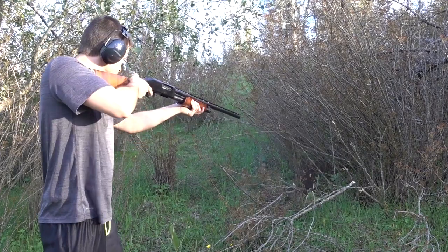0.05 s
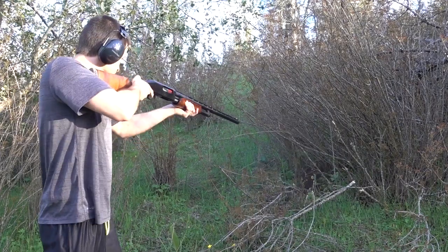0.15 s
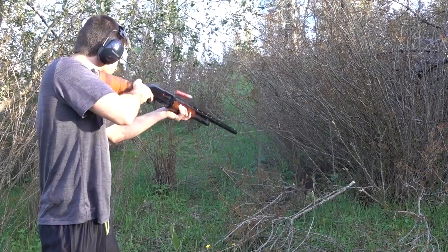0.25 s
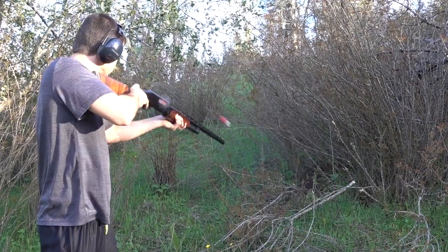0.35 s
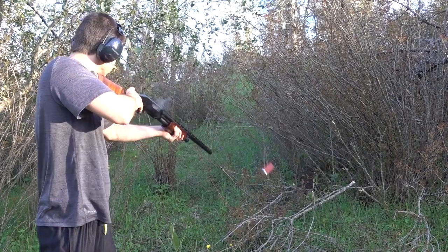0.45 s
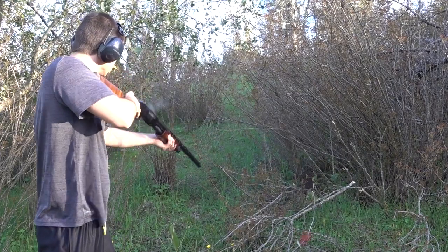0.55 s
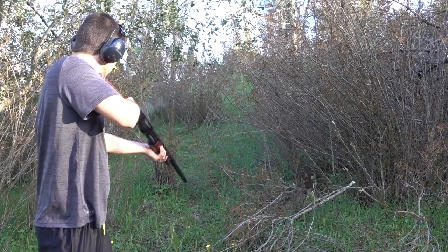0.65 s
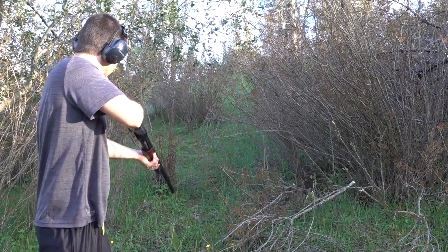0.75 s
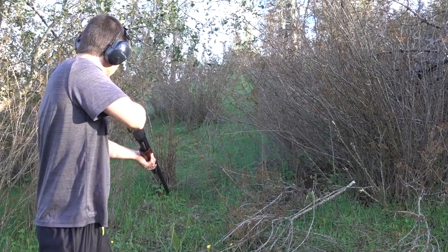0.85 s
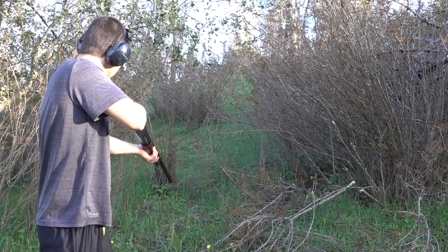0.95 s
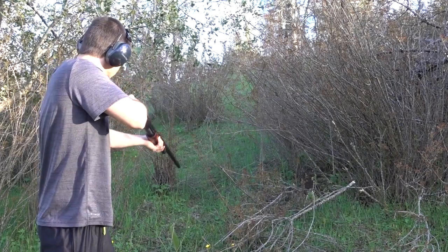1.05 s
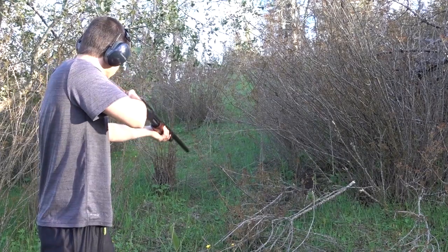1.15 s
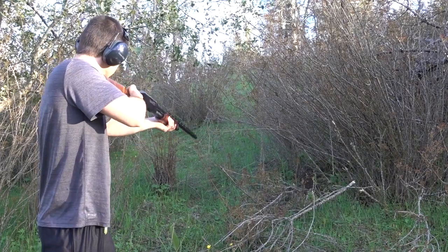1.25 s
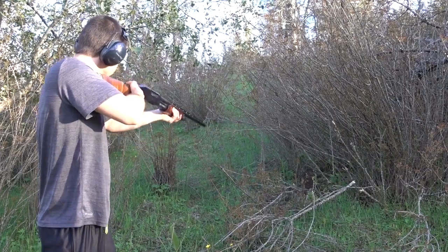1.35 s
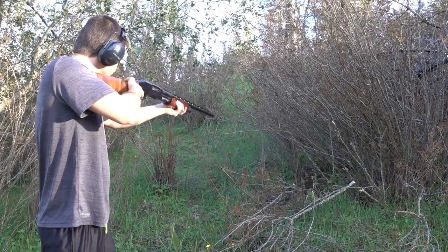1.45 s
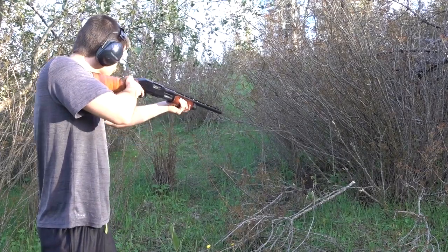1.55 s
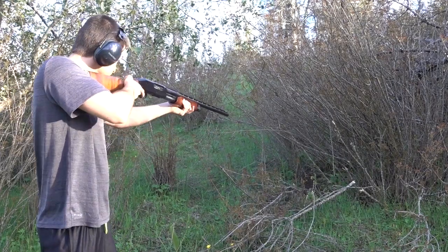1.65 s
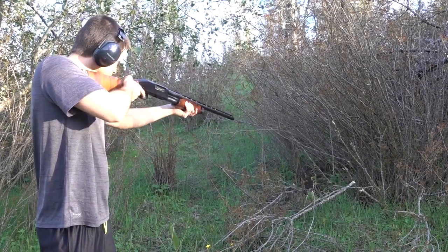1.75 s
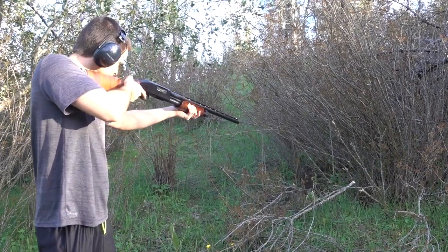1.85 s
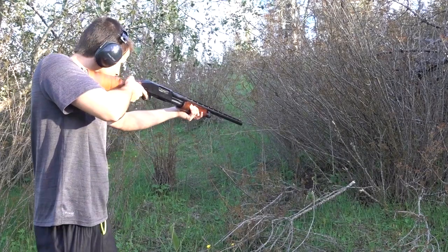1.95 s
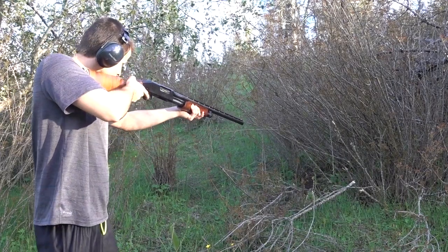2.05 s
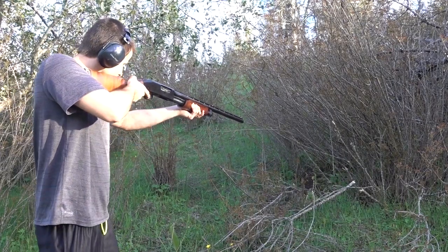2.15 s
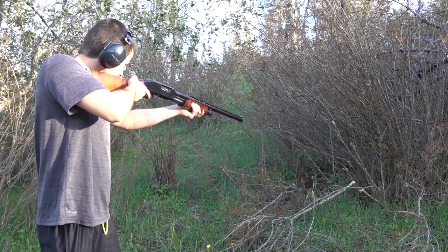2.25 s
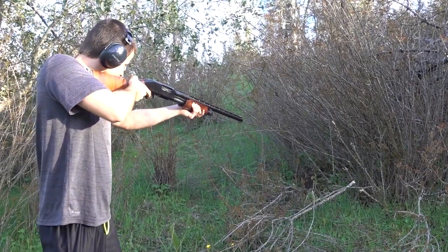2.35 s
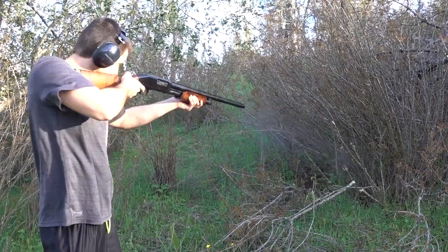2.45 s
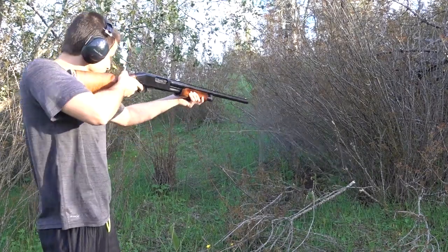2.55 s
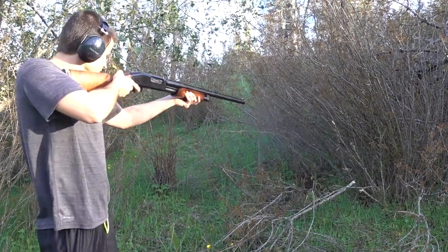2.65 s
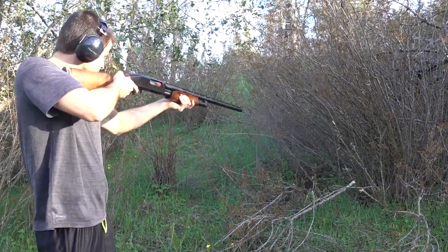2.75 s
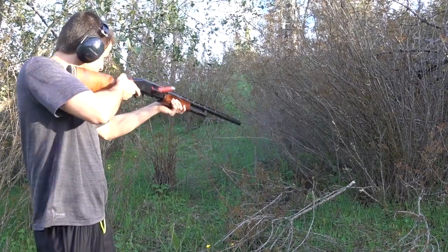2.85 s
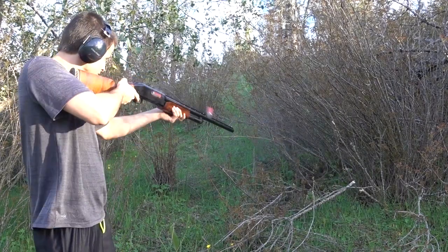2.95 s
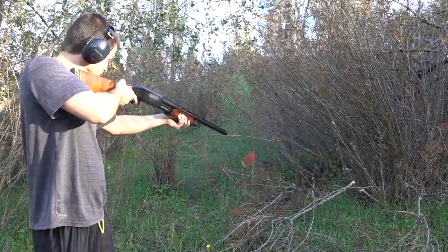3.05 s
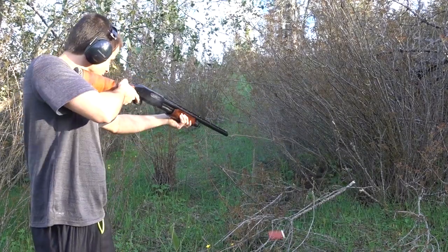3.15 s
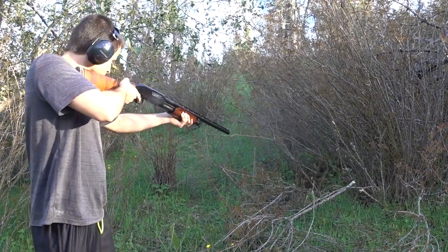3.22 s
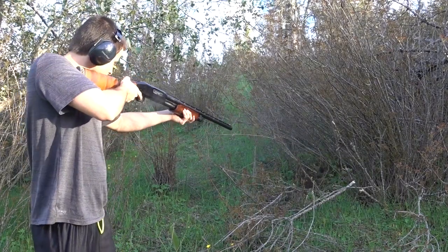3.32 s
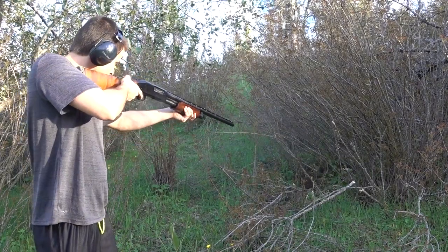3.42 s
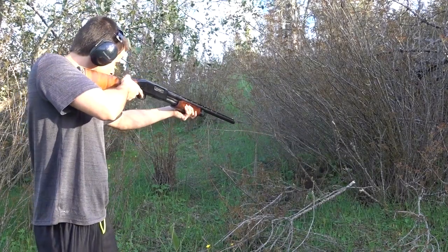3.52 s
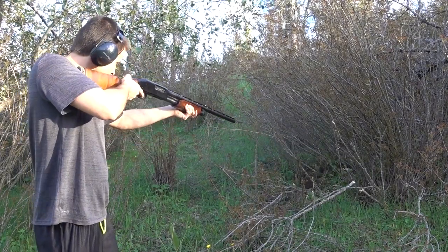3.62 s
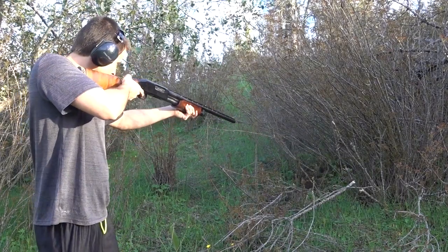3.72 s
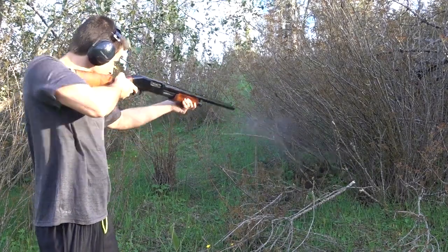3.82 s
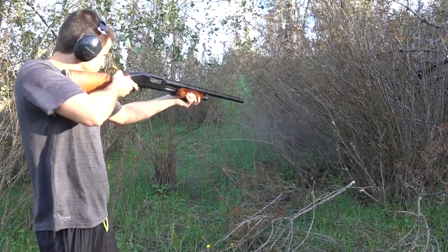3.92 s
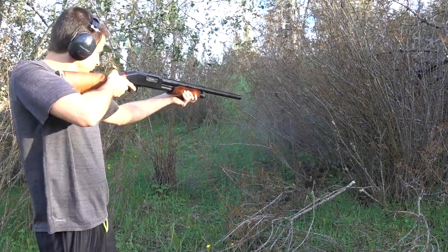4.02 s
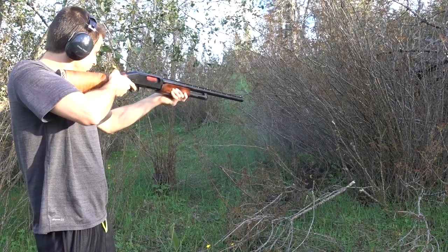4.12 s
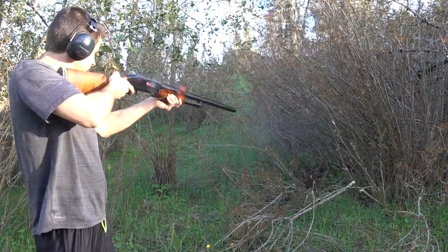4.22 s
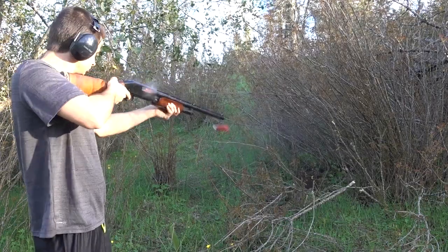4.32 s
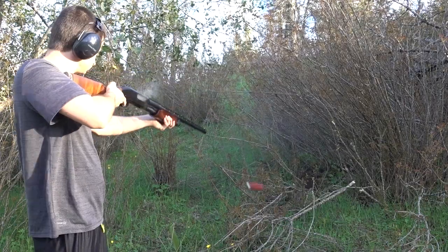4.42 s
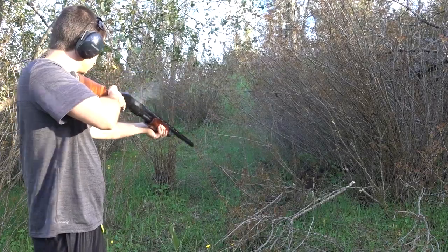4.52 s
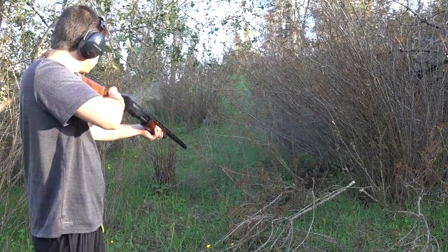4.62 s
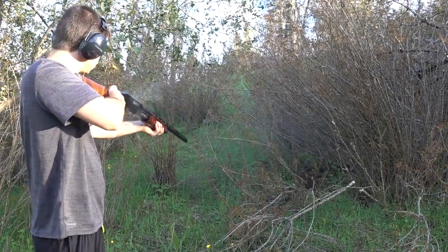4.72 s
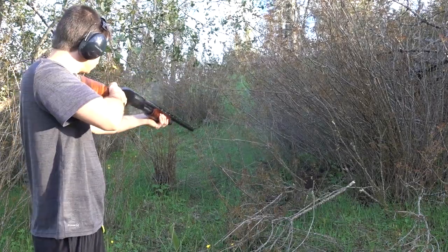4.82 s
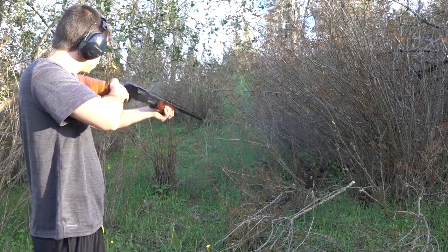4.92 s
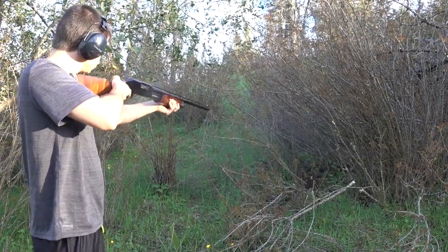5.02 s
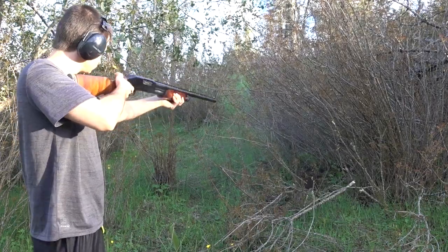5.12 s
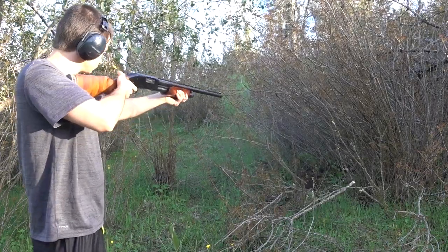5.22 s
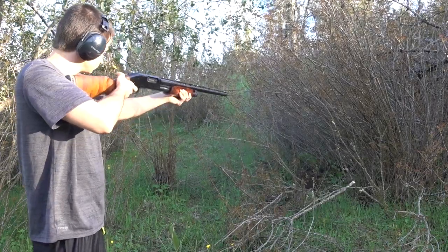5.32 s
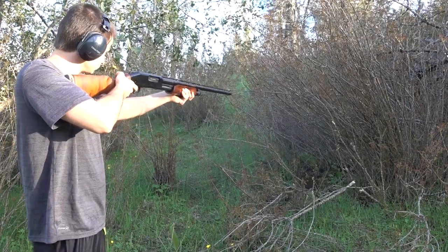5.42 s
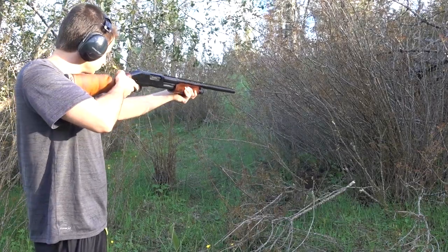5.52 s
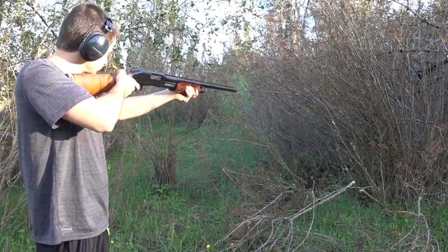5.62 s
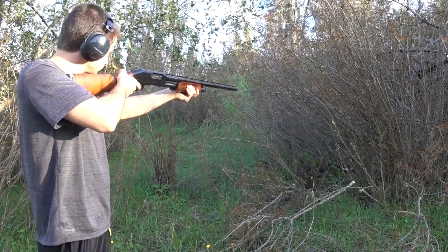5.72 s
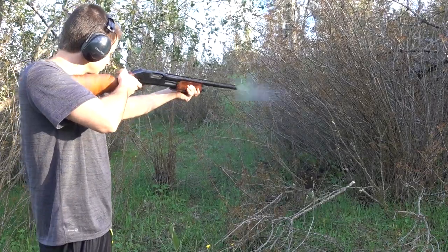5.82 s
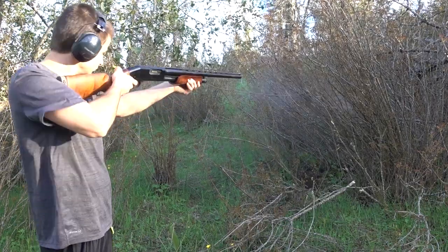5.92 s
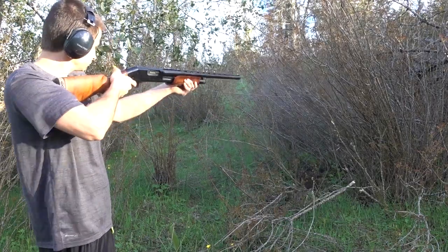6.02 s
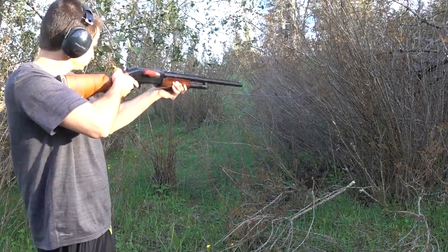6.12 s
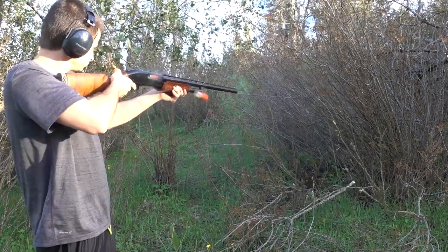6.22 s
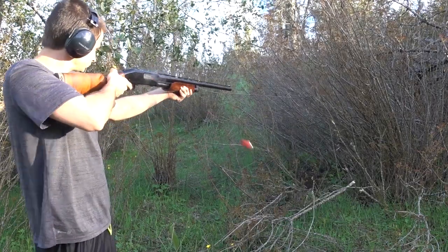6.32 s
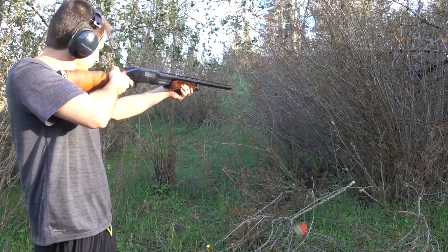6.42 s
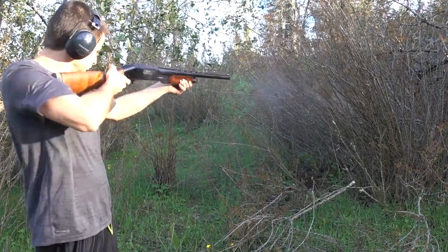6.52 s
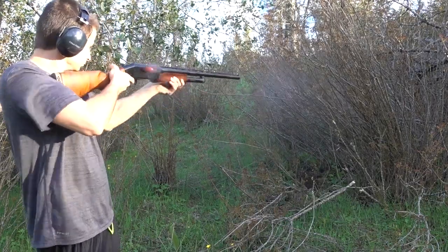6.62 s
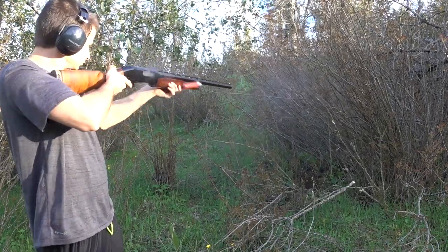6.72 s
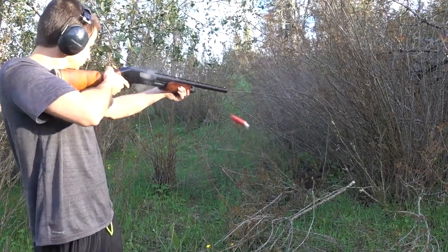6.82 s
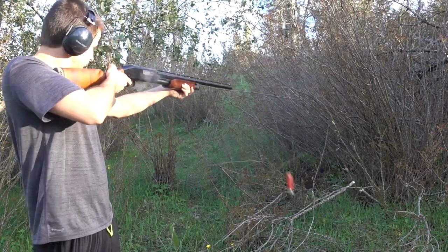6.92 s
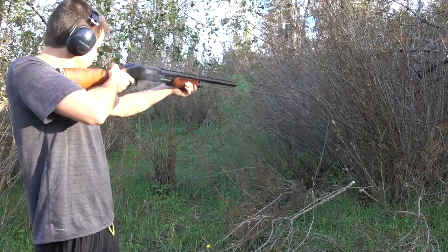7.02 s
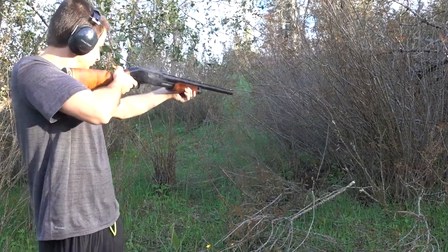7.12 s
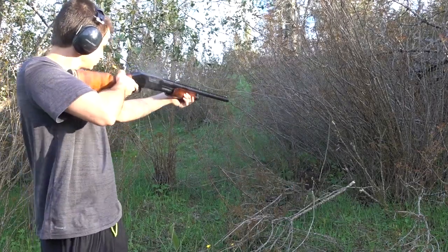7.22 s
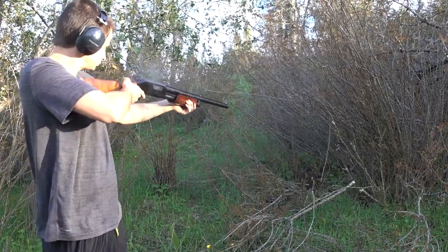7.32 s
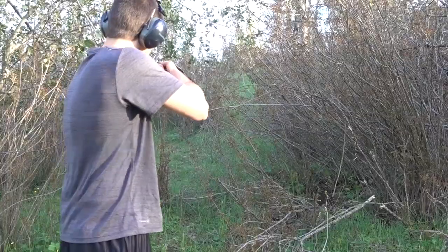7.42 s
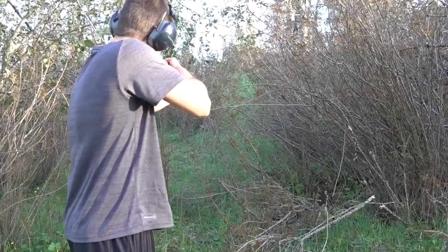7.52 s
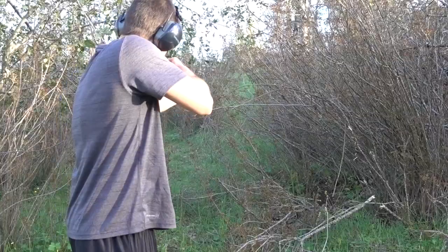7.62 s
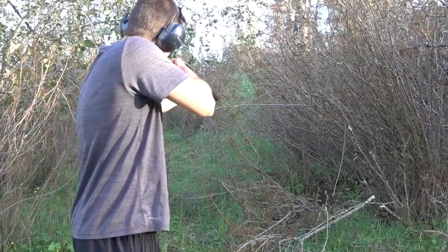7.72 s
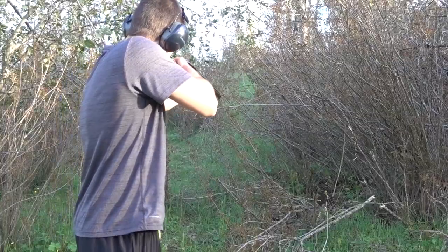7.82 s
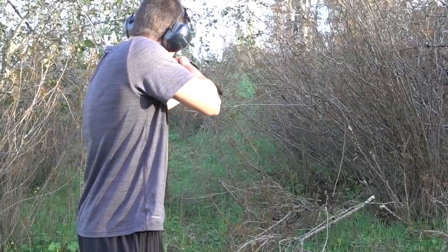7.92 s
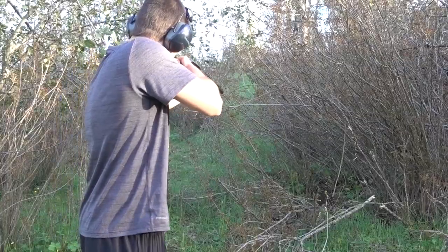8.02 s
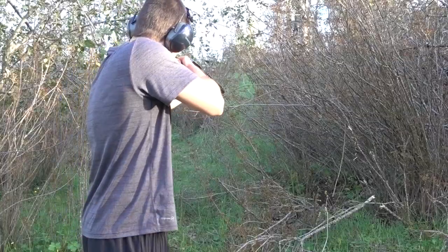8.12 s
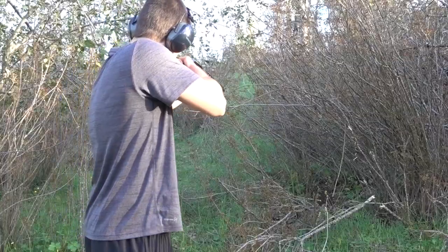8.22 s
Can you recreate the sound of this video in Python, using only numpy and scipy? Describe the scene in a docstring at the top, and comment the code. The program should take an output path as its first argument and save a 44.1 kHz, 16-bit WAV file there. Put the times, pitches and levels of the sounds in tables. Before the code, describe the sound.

A camera microphone close to a shooter captures five shotgun blasts in a wooded clearing, the first caught in mid-roar. Each bursts bright and dense, then dulls into a short lumpy echo leaning right. Quick two-part metallic racking follows, slightly left, crisp and rattling. Quiet gaps hold light ticks, a soft hush of leaves, a faint band of distant frogs and thin pulsed cricket chirps, clearest at the end.

```python
"""A pump shotgun fires five times in a brushy clearing; the first roar is already under way at the start.
Blast echoes are shaped stereo noise: bright from the near brush, duller from the trees beyond.
The racked steel action is noise bursts, rings and chatter; shells and twigs tick in the same steel-toned way.
A cricket chirps in pulsed tones over a hush of leaves and a faint noise band of far frogs."""
import sys
import numpy as np
from scipy import signal
from scipy.fft import rfft, irfft, next_fast_len
from scipy.io import wavfile
from scipy.ndimage import uniform_filter1d, map_coordinates

SR = 44100
rng = np.random.default_rng(int(sys.argv[2]) if len(sys.argv) > 2 else 0)


def ratio(d):
    """dB to gain"""
    e = np.asarray(d, float) / 20
    return 10 ** e


def waveform_to_disk(signal):
    """Save audio, clipped to [-1, 1], as 16-bit WAV at the path in sys.argv[1]."""
    frames = np.transpose(np.atleast_2d(signal))
    scaled = np.clip(frames, -1, 1) * 32767
    samples = np.round(scaled).astype(np.int16)
    wavfile.write(sys.argv[1], SR, samples)


N = 364266
TIME = np.arange(N) / SR  # seconds


def unit(x):
    """Scaled to rms 1."""
    return x / np.sqrt(np.mean(x ** 2) + 1e-20)


def along(points, hz):
    """(Hz, value) points read on a log frequency axis."""
    f, v = np.transpose(points)
    return np.interp(np.log(hz + 1), np.log(f + 1), v)


def level(start, after_s, db, fade):
    """Gain per sample: silent before start, then dB at the given delays, then dying at fade dB a second."""
    age = TIME - start
    dying_db = fade * np.maximum(age - after_s[-1], 0)
    return (age >= 0) * ratio(np.interp(age, after_s, db) - dying_db)


def wobble(rate):
    """A smooth random curve, rate knots a second."""
    knots = rng.standard_normal(int(N * rate / SR) + 4)
    return map_coordinates(knots, [TIME * rate])


def filtered(x, response):
    """x passed through a response of frequency, which may be complex."""
    m = next_fast_len(N + SR // 2)
    return irfft(rfft(x, m) * response(np.fft.rfftfreq(m, 1 / SR)), m)[..., :N]


def rush(tone, alike, lo_hz, hi_hz, patchy_db):
    """Toned stereo noise in patches of random gain; its middle has rms 1 between lo_hz and hi_hz."""
    z = signal.stft(rng.standard_normal((2, N)), nperseg=256)[2]
    field = uniform_filter1d(rng.standard_normal(z.shape[1:]), size=5, axis=0)
    field = uniform_filter1d(field, size=5, axis=1)
    pair = signal.istft(z * ratio(patchy_db * unit(field)), nperseg=256)[1][:, :N]

    def mid_side(hz):
        # half the angle whose cosine is the left-right correlation
        turn = np.arccos(np.clip(along(alike, hz), -1, 1)) / 2
        return ratio(along(tone, hz)) * np.array([np.cos(turn), np.sin(turn)])

    mid, side = filtered(pair, mid_side)
    band = filtered(mid, lambda hz: (hz > lo_hz) & (hz < hi_hz))
    return np.array([mid + side, mid - side]) / np.sqrt(np.mean(band ** 2))


# Moments of the blasts, in seconds; the first goes off just before the start.
BLAST_S = [-.17, 2.469, 3.862, 5.922, 6.561]
# How the aim of each blast wakes the clearing. Each row: drive in dB of the trees, of the far tree line
# and of the brush, brush hold in seconds, brush fade in dB per second.
BLAST_AIM = [(-25, -48.5, -24.5, 0.17, 171.5), (-20.5, -46.5, -15.5, 0.15, 126),
             (-22, -46.5, -16.5, 0.18, 181.5), (-23.5, -47, -14.5, .2, 408), (-26, -55.5, -11, 0.15, 270)]
# The near trunks answer every blast alike. Each row: seconds after the blast, dB added to the trees' drive.
TRUNK_ANSWER = [(0, -20), (0.059, -3), (.12, -4.5), (.165, 1), (0.201, -5.5), (0.302, -10), (.46, -21),
                (0.679, -33.5)]
# A far tree line returns late. Each row: seconds after the blast, dB added to the far tree line's drive.
FAR_LINE_ANSWER = [(.5, -29.5), (.75, -8), (.92, -5), (1.06, -9.5), (1.2, -16.5), (1.35, -34)]
# Colour of the tree echoes before their treble is lost. Each row: frequency in Hz, relative density in dB.
TRUNK_COLOUR = [(24, -73.5), (40, -35.5), (149, -44.5), (352, -20.5), (554, -3.5), (607, -5.5), (664, -1.5),
                (761, -2), (977, 0.5), (1800, 2), (9000, -23), (11700, -49), (19800, -120)]
# Colour of the brush echoes at their brightest. Each row: frequency in Hz, relative density in dB.
BRUSH_COLOUR = [(24, -78.5), (40, -49), (272, -15.5), (702, -2.5), (1370, -14), (1720, -0.5), (2000, -2),
                (3630, -0.5), (7860, -4), (15400, -7.5)]
# Stereo width of the echo noise. Each row: frequency in Hz, left-right correlation (1 is mono).
ECHO_WIDTH = [(60, 1), (300, 0.99), (600, 0.96), (1650, .63), (4970, .06), (15000, .04)]
ECHO_FADE_DB_PER_S = 80
BRUSH_RISE_S, BRUSH_RISE_DB, BRUSH_SAG_DB_PER_S = 0.006, 5, 36


def tree_echoes(age):
    """The roar is randomly lumpy; the longer the path, the more treble the air and leaves take."""
    after_s, answer_db = np.transpose(TRUNK_ANSWER)
    late_s, late_db = np.transpose(FAR_LINE_ANSWER)
    gain = 0
    for s, (trees_db, far_db, *_) in zip(BLAST_S, BLAST_AIM):
        gain = gain + level(s, after_s, trees_db + answer_db, ECHO_FADE_DB_PER_S)
        gain = gain + level(s + late_s[0], late_s - late_s[0], far_db + late_db, ECHO_FADE_DB_PER_S)
    early = rush(TRUNK_COLOUR, ECHO_WIDTH, 400, 1116, patchy_db=2.0)
    late = filtered(early, lambda hz: (1 + (450 / (hz + 300)) ** 2) / (1.3 + (hz / 1350) ** 4))
    share = np.clip((age - 0.2) / 0.45, 0, 1)  # the dull noise takes over, and the lumps smooth out
    lumps = ratio(2.37 * (1 - 0.9 * share) * wobble(70))
    trees = gain * lumps * (early + share * (late - early))
    return trees * ratio([[-0.4], [0.4]])  # leans to the right


def brush_echoes(age):
    """Bright noise leaps up with each blast, sags, then fades, losing treble as it ages."""
    gain = 0
    for s, (*_, db, hold, fade) in zip(BLAST_S, BLAST_AIM):
        course_db = [db - BRUSH_RISE_DB, db, db - BRUSH_SAG_DB_PER_S * hold]
        gain = gain + level(s, [0, BRUSH_RISE_S, hold], course_db, fade)
    near = rush(BRUSH_COLOUR, ECHO_WIDTH, 2400, 21000, patchy_db=3.3)
    behind = 1.3 * filtered(near, lambda hz: 1 / (1 + (hz / 7500) ** 2))
    share = np.clip((age - 0.035) / 0.12, 0, 0.8)
    return gain * ratio(0.55 * wobble(150)) * (near + share * (behind - near))


def echoes():
    """The roar of tree and brush echoes, dulling with the time since the latest blast."""
    shots = np.array(BLAST_S)
    age = TIME - shots[np.searchsorted(shots[1:], TIME)]
    return tree_echoes(age) + brush_echoes(age)


# The evening air. Each row: time in seconds, gain in dB of the leaves, gain in dB of the far frogs,
# both before their slow wavering.
EVENING_AIR = [(0, -41.5, -69.5), (1.1, -61, -71), (1.5, -66, -70), (2.4, -61.5, -66), (3.6, -80.5, -72),
               (5.301, -69, -74), (5.45, -70, -74.5), (5.9, -65.5, -72), (7.41, -65, -68.5),
               (7.45, -55.5, -60.5), (7.7, -56, -62.5), (7.85, -59.5, -61.5), (8.26, -60.5, -63.5)]
# Colour of the leaves and of the blast tails. Each row: frequency in Hz, relative density in dB.
AIR_COLOUR = [(35, -66.5), (60, -45.5), (81, -31), (183, -31.5), (253, -34.5), (597, -11), (719, -6.5),
              (1090, -7.5), (2140, -5.5), (2460, -3.5), (2900, -7.5), (10400, -12), (14400, -13),
              (15400, -14.5)]
# Stereo width of the same noise. Each row: frequency in Hz, left-right correlation (1 is mono).
AIR_WIDTH = [(60, 0.93), (240, 0.62), (950, 0.13), (3770, 0.27), (15000, 1)]
# a broadband tail of each blast lingers, then fades; the dB adds to that blast's far tree line drive
TAIL_DB, TAIL_HOLD_S, TAIL_DB_PER_S = -8, 0.72, 20.5


def air():
    """A hush of leaves and a broadband tail of each blast, with a band of far frogs below and near 2.5 kHz."""
    air_s, leaves_db, frogs_db = np.transpose(EVENING_AIR)
    leaves = level(0, air_s, leaves_db, fade=0)
    tail = sum(level(s, [0, TAIL_HOLD_S], [far_db + TAIL_DB] * 2, TAIL_DB_PER_S)
               for s, (_, far_db, *_) in zip(BLAST_S, BLAST_AIM))
    hush = ratio(0.8 * wobble(8.1)) * rush(AIR_COLOUR, AIR_WIDTH, 2100, 15000, patchy_db=1.2)

    def frog_band(hz):
        peak = 1 / (1 + ((hz - 2480) / 120) ** 2)
        plateau = 0.62 / (1 + ((hz - 2050) / 600) ** 6)
        return peak + plateau

    frogs = unit(filtered(rng.standard_normal((2, N)), frog_band))
    frog_gain = level(0, air_s, frogs_db, fade=0) * ratio(1.1 * wobble(0.81) + 1.5 * wobble(25))
    return np.hypot(leaves, tail) * hush + frog_gain * frogs


# Resonances of receiver and barrel. Each row: centre in Hz, width in Hz, strength in dB over the background.
STEEL_MODES = [(1190, 600, -15.5), (2525, 59, -12.5), (3460, 170, -11.5), (4100, 160, -5),
               (6040, 250, -13.5), (7260, 510, -14.5), (10800, 400, -22.5)]


def modes(f):
    """The steel's resonances over a broad background."""
    return 1 + sum(ratio(db) * 1j * f * w / (c * c - f * f + 1j * f * w) for c, w, db in STEEL_MODES)


# The fore-end goes back, forward, and the bolt locks. Each row: start in seconds, length in seconds,
# drive in dB at the start, drive in dB at the end.
PUMP_STROKES = [(0.231, 0.11, -19, -23.5), (0.404, 0.094, -21, -32.5), (0.503, 0.013, -40.5, -17.5),
                (2.843, 0.1, -21.5, -20.5), (3.004, 0.084, -29, -22.5), (3.105, 0.029, -27, -24.5),
                (4.167, 0.098, -24, -21), (4.351, .085, -29.5, -24), (4.454, 0.023, -17, -24.5),
                (6.151, .096, -18, -25), (6.297, 0.054, -20.5, -23), (6.373, 0.02, -15.5, -24),
                (6.802, 0.091, -27.5, -23), (7.121, .005, -23, -25)]
STROKE_RISE_S, STROKE_RISE_DB, STROKE_STOP_DB_PER_S = 0.0027, 16, 562
STROKE_ECHO_DB, STROKE_ECHO_DB_PER_S = -14, 145.5  # the brush throws the clatter back


def slide():
    """Gain of the sliding fore-end: a quick start, the stroke, a hard stop and a short echo."""
    gain = 0
    for s, length, db0, db1 in PUMP_STROKES:
        course_s = [0, STROKE_RISE_S, STROKE_RISE_S + length]
        gain = gain + level(s, course_s, [db0 - STROKE_RISE_DB, db0, db1], STROKE_STOP_DB_PER_S)
        gain = gain + level(s + length, [0], [db1 + STROKE_ECHO_DB], STROKE_ECHO_DB_PER_S)
    return gain


def rattles():
    """Loose parts knock about every 11 ms while the slide moves, each ringing on a chance resonance."""
    rows = []
    spread_db = 2.5
    for start, length, db0, db1 in PUMP_STROKES:
        gap, body, treble, pick = rng.standard_normal((16, 4)).T
        after = np.cumsum(0.011 * np.exp(0.4 * gap))
        db = db0 + (db1 - db0) * after / length
        mode = np.clip(np.round(2.3 + 1.3 * pick), 1, 5).astype(int)
        hz = np.array(STEEL_MODES)[mode, 0]
        rattle = zip(start + after, db + spread_db * body, db + spread_db * treble, hz)
        rows += [row for row in rattle if row[0] < start + length]
    return rows


# Hard clacks of bolt, carrier and shell. Each row: start in seconds, body drive in dB, treble drive in dB,
# ring of the struck part in Hz.
BOLT_CLACKS = [(0.1354, -19, -25, 2100), (0.172, -20, -23.5, 2720), (0.187, -14.5, -14, 3350),
               (0.1984, -23, -36, 2810), (0.2049, -8, -21.5, 2450), (0.2274, -12.5, -20, 3310),
               (0.2424, -19, -30, 2560), (0.2504, -18, -9, 3380), (0.2774, -18, -17, 2940),
               (0.2834, -8.5, -4, 2760), (0.3014, -21, -15, 3810), (0.3222, -24, -16, 4930),
               (0.3356, -38, -11, 4220), (0.3444, -8, -1, 4240), (0.3925, -26, -23.5, 3700),
               (0.4105, -27, -20, 3740), (0.4155, -22, -9.5, 3280), (0.4256, -33, -23, 4140),
               (0.4364, -21, -10, 3790), (0.4494, -23, -33.5, 6760), (0.4714, -16.5, -29, 3340),
               (0.4798, -9, -17.5, 3320), (0.5122, -11, -5.5, 5640), (0.5234, -14, -13.5, 3270),
               (0.5334, -17, -7.5, 3820), (2.81, -10.5, -22, 2760), (2.8154, -6, -15.5, 2600),
               (2.8444, -14, -29.5, 2920), (2.8604, -13, -15, 4400), (2.8893, -12.5, -18.5, 2620),
               (2.8954, -7.5, -13, 4100), (2.9144, -15, -19, 3780), (2.9304, -25, -20, 3530),
               (2.9417, -28, -24.5, 4070), (2.9504, -15.5, -17, 4440), (3.0084, -24, -26, 4000),
               (3.0235, -13.5, -4.5, 3700), (3.0324, -12.5, -15.5, 3320), (3.0484, -29.5, -16.5, 2630),
               (3.0739, -13, -23, 3470), (3.0859, -15.5, -16.5, 3800), (3.0924, -8.5, -23, 3650),
               (3.1108, -12, -22, 3120), (3.1154, -21, -4.5, 5800), (3.1243, -4.5, -19, 3110),
               (3.1334, -13.5, -9.5, 2860), (4.1354, -12.5, -21, 2500), (4.1474, -13.5, -19.5, 1980),
               (4.1544, -11.5, -33.5, 2520), (4.1704, -20, -32, 3180), (4.1934, -20, -24.5, 6500),
               (4.2034, -24, -15, 10400), (4.2218, -18, -25.5, 5930), (4.2288, -15, -6.5, 4260),
               (4.2614, -12.5, -4.5, 8060), (4.2717, -12.5, -8.5, 3900), (4.2829, -14, -21.5, 4370),
               (4.3605, -31, -13.5, 6450), (4.366, -13.5, -7, 2110), (4.3704, -11, -19, 2890),
               (4.3969, -23.5, -19.5, 3020), (4.4308, -7.5, -24, 3430), (4.4568, -19.5, -20.5, 5800),
               (4.4662, -10.5, -11, 3080), (4.4754, -9.5, -6.5, 3120), (6.1192, -4.5, -22, 2150),
               (6.1634, -23, -23, 5600), (6.1774, -39, -23.5, 2550), (6.1924, -21, -18, 2030),
               (6.2014, -19, -5, 2370), (6.2274, -17, -7, 10000), (6.2367, -10.5, -24.5, 2520),
               (6.2514, -13, -15, 4050), (6.2944, -12, -17.5, 4130), (6.3001, -26, -32, 4300),
               (6.3106, -13, -27, 4100), (6.3464, -20, -8, 3820), (6.352, -8, -28, 2660),
               (6.3754, -29, -29, 5730), (6.3844, -23, -21, 3370), (6.3894, -17, -7.5, 2750),
               (6.7084, -21, 1.5, 2050), (6.8134, -14, -32, 2660), (6.8294, -7.5, -7.5, 4050),
               (6.8568, -10.5, -22.5, 3740), (6.8764, -24, -7, 5930), (6.8828, -8, -10, 3220),
               (6.8904, -18, -7, 4050), (7.1144, -27, -30, 2420), (7.1222, -18, -23.5, 5040),
               (7.1344, -21, -18, 3270), (7.2285, -27, -27, 4040)]
# Trigger take-up, sear and hammer. Each row: body drive in dB, treble drive in dB, 60 dB decay in seconds.
TRIGGER_CLICKS = [(-41, -60, .025), (-34, -39, .06), (-22, -25, .04)]
# How far those three lead every blast but the first, in seconds.
TRIGGER_BEFORE_S = [.05, .031, .008]
# Twigs, spent shells and hands. Each row: start in seconds, body drive in dB, treble drive in dB,
# ring in Hz, left over right in dB.
GRASS_TICKS = [(0.781, -32, -31, 6740, -2), (0.892, -53, -44, 1090, 10), (0.995, -62, -42, 8520, 1.5),
               (1.061, -40, -33, 920, 2.0), (1.072, -46, -40, 5840, -0.5), (1.103, -47, -41, 11800, -4),
               (1.149, -47, -31.5, 6500, 3), (1.254, -50.5, -44, 11600, 1), (1.278, -54, -42, 2260, -0.5),
               (1.384, -49, -40, 7300, -2.5), (1.418, -43, -31.5, 8300, 2.0), (1.588, -62, -50, 1730, 14),
               (1.736, -47, -43, 4900, 0.0), (1.767, -29.5, -25, 8100, -0.5), (1.782, -51, -36, 4830, 3),
               (1.901, -65, -45, 2410, 3.5), (3.406, -36.5, -30, 1180, 0), (3.544, -54, -37, 802, -3),
               (4.726, -34.5, -31.5, 1120, 0), (4.88, -49, -38, 845, -3), (4.916, -52, -40.5, 10500, -8),
               (4.934, -49, -38, 1310, 0), (5.062, -44, -44, 1220, 2.0), (5.073, -37, -32, 1280, -1.0),
               (5.089, -35.5, -36, 1260, -0.5), (5.127, -46, -40.5, 7570, -1),
               (5.155, -43.5, -44, 1984, 2.0), (5.248, -56, -58, 2730, 1.0), (5.29, -60, -50, 2740, -1),
               (5.317, -51, -57, 2410, 1.0), (5.365, -62, -52, 7740, -3), (5.604, -56, -44, 4610, -4),
               (5.644, -64, -46, 8830, 7), (5.711, -59, -66, 2480, 5.5), (5.792, -44, -32, 4900, -5),
               (7.278, -45, -68, 2500, 1.5), (7.304, -38, -40, 1340, 3.5), (7.356, -45, -64, 966, 4),
               (7.481, -43, -36, 2500, 11), (7.689, -41.5, -37, 3700, 5), (7.741, -38, -57, 1450, 3.5),
               (7.794, -41.5, -63, 1005, 4)]


def knocks():
    """All contacts as rows: start s, body dB, treble dB, ring Hz, 60 dB decay s, left over right dB."""
    gun = list(BOLT_CLACKS) + rattles()
    life, pan = rng.random((400, 2)).T
    rows = [(*row, 0.021 * (0.56 + 0.9 * a), 1 + (2 * p - 1)) for row, a, p in zip(gun, life, pan)]
    for s in BLAST_S[1:]:
        for lead, (body, treble, t60) in zip(TRIGGER_BEFORE_S, TRIGGER_CLICKS):
            rows.append((s - lead, body, treble, STEEL_MODES[1][0], t60, 1))
    return rows + [(s, body, treble, hz, 0.035, pan_db) for s, body, treble, hz, pan_db in GRASS_TICKS]


# Colour of the steel noise before its resonances. Each row: frequency in Hz, relative density in dB.
STEEL_COLOUR = [(24, -87.5), (40, -55), (358, -27), (437, -32), (483, -26), (775, -14), (1050, -9.5),
                (1720, -6.5), (2560, -1), (12600, -5), (15400, -10)]
# Stereo width of the steel noise. Each row: frequency in Hz, left-right correlation (1 is mono).
STEEL_WIDTH = [(200, 1), (1650, 1), (5000, 0.59), (15000, 0.36)]
# A thin ring left by the last slam of the bolt: start in seconds, pitch in Hz, level in dB,
# 60 dB decay in seconds.
BARREL_RING = (7.125, 2067, -39, .17)
RING_DB, TREBLE_DIES_DB_PER_S = -6.5, 700


def action():
    """Each knock is a dying burst through the steel plus one ring; the slide chatters between knocks."""
    steel = unit(filtered(rush(STEEL_COLOUR, STEEL_WIDTH, 1500, 15000, patchy_db=2.33), modes))
    body = filtered(steel, lambda hz: 1 / (1 + (hz / 5000) ** 6))
    treble = steel - body
    thud, tick, ring = np.zeros((3, 2, N + SR))
    t = np.arange(SR // 10) / SR
    for s, body_db, treble_db, hz, t60, pan_db in knocks():
        sides = ratio([[pan_db / 2], [-pan_db / 2]])
        decay = 0.4 * ratio(-60 * t / t60) + 0.6 * ratio(-60 * t / 0.006)  # a hard first contact, then the body
        shape = decay * (1 - np.exp(-t / 0.0004)) * sides
        span = slice(round(s * SR), round(s * SR) + len(t))
        thud[:, span] += ratio(body_db) * shape
        tick[:, span] += ratio(treble_db - TREBLE_DIES_DB_PER_S * t) * shape
        ring_db = (body_db if hz < 5000 else treble_db) + RING_DB
        ring[:, span] += ratio(ring_db - 60 * t / t60) * sides * np.sin(2 * np.pi * hz * t)
    blows = unit(body) * thud[:, :N] + unit(treble) * tick[:, :N] + ring[:, :N]
    flutter = ratio(1.9 * wobble(500) + 1.1 * wobble(90))
    chatter = steel * slide() * flutter * ratio([[1.1], [-1.1]])

    def radiated(hz):
        # small steel parts radiate little bass; the gun is nearer the left microphone, which hears it first
        lead = np.exp(1j * np.pi * hz * 0.000013 * np.array([[1], [-1]]))
        return lead * (1j * hz / (350 + 1j * hz)) ** 2

    s, hz, db, t60 = BARREL_RING
    barrel = (TIME > s) * ratio(db - 60 * np.abs(TIME - s) / t60) * np.sin(2 * np.pi * hz * TIME)
    return filtered(blows + chatter, radiated) + barrel


# Cricket chirps. Each row: start in seconds, length in seconds, drive in dB before fade and flutter.
CRICKET_CHIRPS = [(.86, .074, -61), (1.29, .1, -61), (1.73, .1, -58), (2.169, .11, -58), (5.0, .066, -65),
                  (5.478, .1, -64), (7.5, .14, -55), (7.916, .24, -54)]
CHIRP_HZ, CHIRP_SAG_HZ_PER_S, CHIRP_FADE_DB_PER_S, PULSES_PER_S = 4770, 600, 12, 58


def cricket():
    """Trains of slightly rough tone pulses that tire in level and sag in pitch."""
    starts = np.array([row[0] for row in CRICKET_CHIRPS])
    age = np.clip(TIME - starts[np.searchsorted(starts[1:], TIME)], 0, 0.3)
    train = 0
    for s, length, db in CRICKET_CHIRPS:
        swell = np.sin(np.pi * np.clip((TIME - s) / length, 0, 1)) ** 0.18
        pulses = np.sin(np.pi * PULSES_PER_S * (TIME - s)) ** 2
        train = train + ratio(db) * swell * pulses
    pitch = CHIRP_HZ - CHIRP_SAG_HZ_PER_S * age + 100 * wobble(500)
    phase = 2 * np.pi * np.cumsum(pitch) / SR
    sides = np.array([np.sin(phase), 1.2 * np.sin(phase + 0.59)])
    return train * ratio(2.4 * wobble(56) - CHIRP_FADE_DB_PER_S * age) * sides


def scene():
    """Blast echoes, the evening around them, the gun's steel and the cricket."""
    return echoes() + air() + action() + cricket()


def roll_off(x):
    """The treble ends steeply here."""
    return signal.sosfilt(signal.butter(12, 16810, fs=SR, output="sos"), x)


def record(dry):
    """Peaks bend softly at the camera's ceiling; its microphones fall away steeply at the top of the treble."""
    loudness = np.sqrt(np.abs(uniform_filter1d(np.mean(dry ** 2, axis=0), size=400)))
    held = dry / (1 + (loudness / ratio(-14)) ** 2) ** 0.25  # a fast limiter evens out the roar
    bent = held / (1 + np.abs(held / 0.91) ** 4) ** (1 / 4)
    heard = filtered(bent, lambda hz: ratio(np.interp(hz, [15600, 15800, 16800], [0, -32, -55])))
    return roll_off(heard)


dry = scene()
out = record(dry)
waveform_to_disk(out)
```